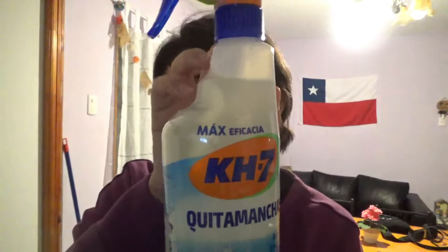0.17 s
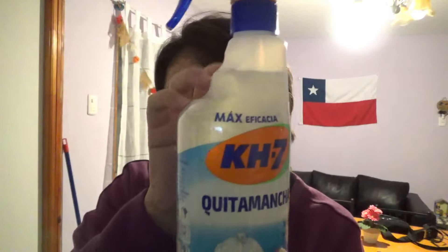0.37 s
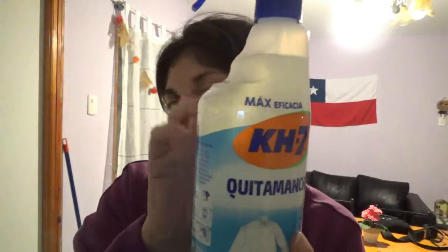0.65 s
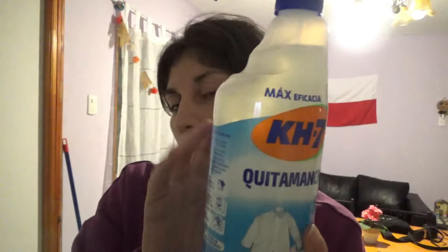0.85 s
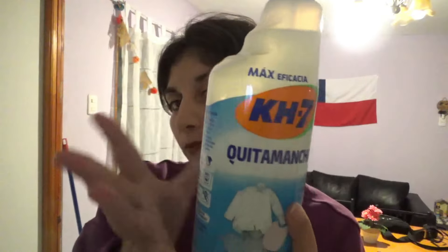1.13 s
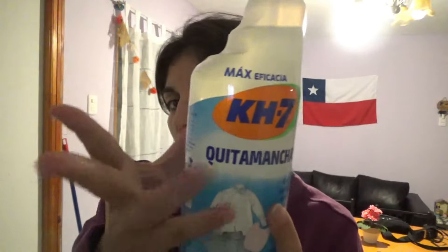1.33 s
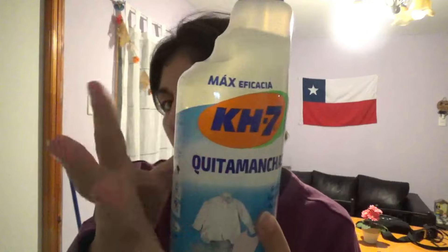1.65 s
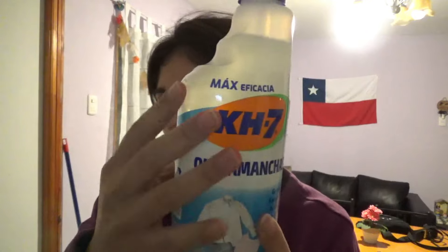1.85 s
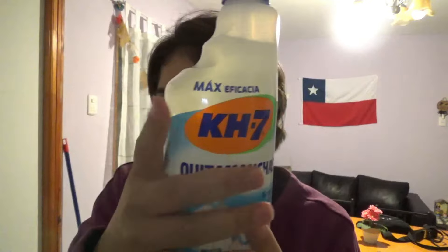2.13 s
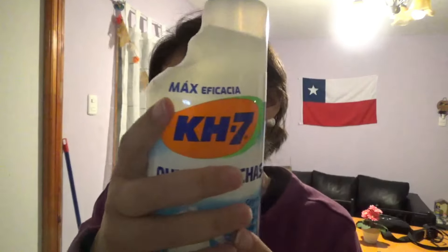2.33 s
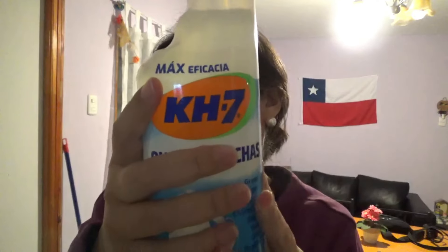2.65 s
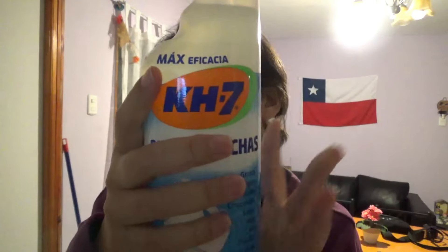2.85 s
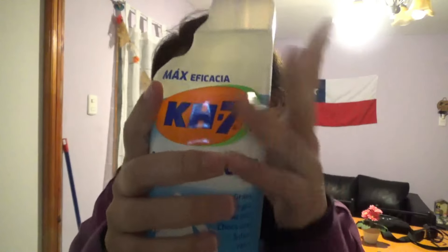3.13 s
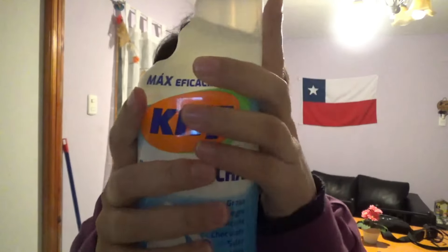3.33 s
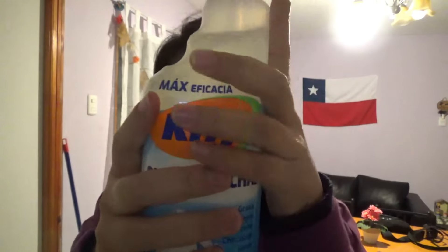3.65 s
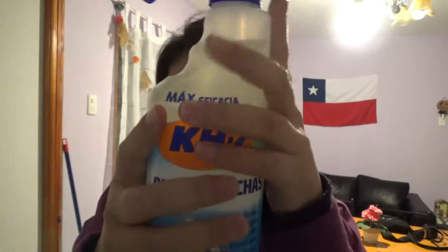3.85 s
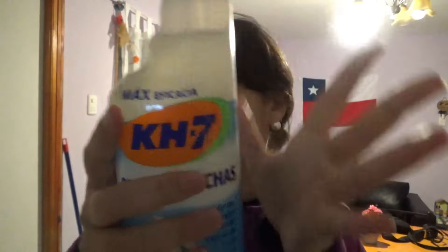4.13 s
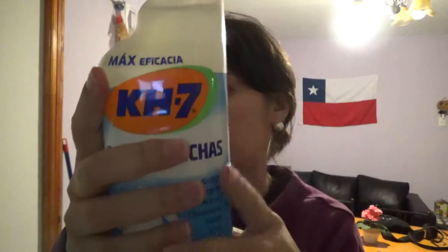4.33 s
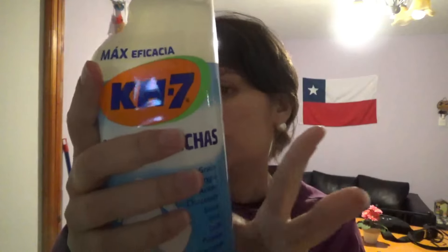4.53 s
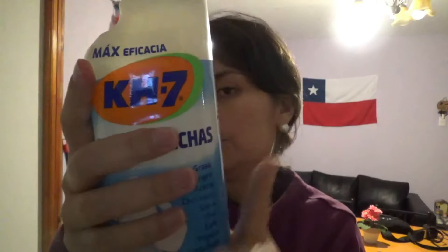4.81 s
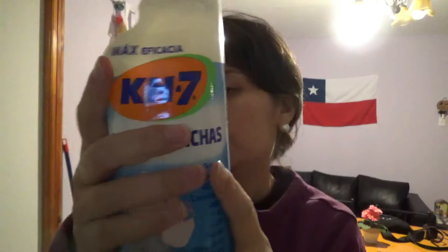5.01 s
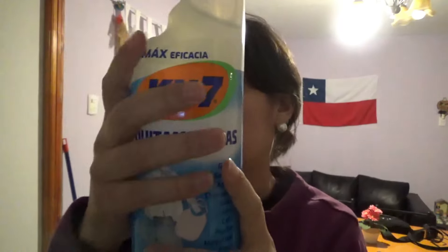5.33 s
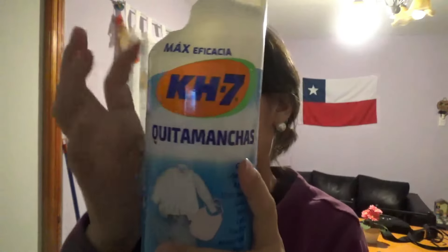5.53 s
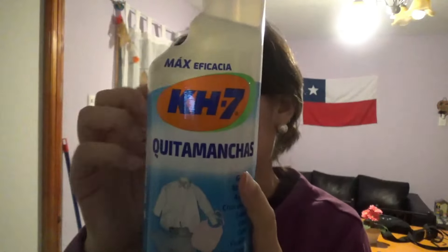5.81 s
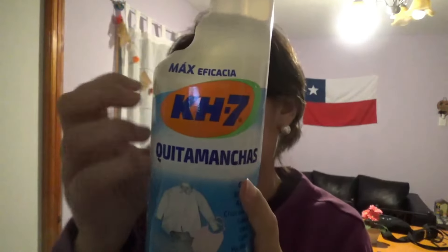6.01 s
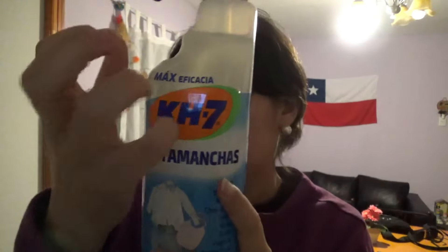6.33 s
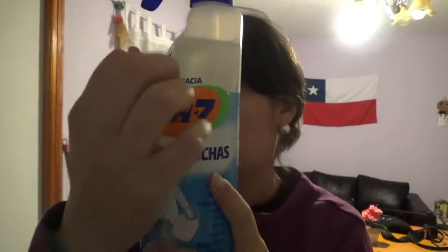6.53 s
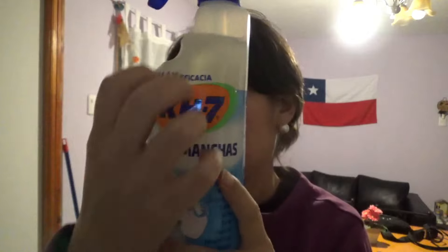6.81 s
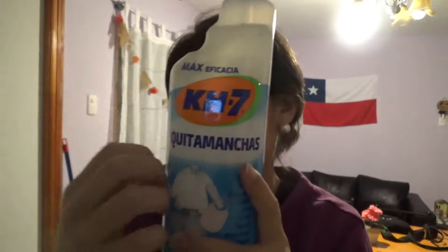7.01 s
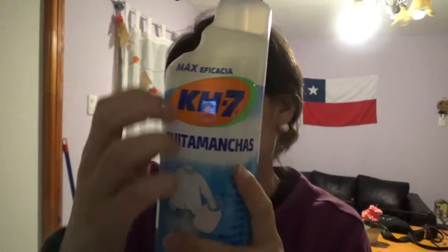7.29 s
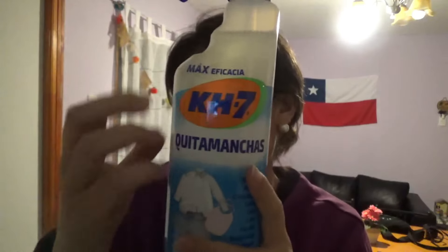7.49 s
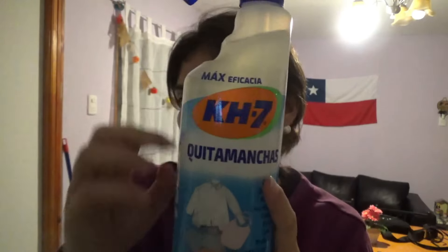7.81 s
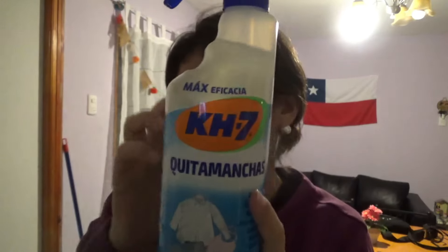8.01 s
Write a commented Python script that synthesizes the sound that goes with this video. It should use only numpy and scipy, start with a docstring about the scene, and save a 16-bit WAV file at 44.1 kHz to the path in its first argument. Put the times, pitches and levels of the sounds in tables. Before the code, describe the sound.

Very close, dry tapping on a filled plastic bottle: crisp nail clicks, often in tight pairs or triplets, each with a small dull body thump. Short airy scrapes trail between them. After a short early gap the taps keep coming unevenly, with strong knocks around the middle, then clusters and rougher rasping strokes toward the end. Small room reflections, slightly dull top end and quiet background rumble.

```python
"""Fingernails on a spray bottle

Fingernails tap, graze and scratch a plastic spray bottle, nearly full of liquid, in a living room.
Each touch sends a sharp burst into ringing tones: a bright nail tick and a clack of the thin wall.
Slow decaying swings add the soft thump of the filled body; a faint second click follows as the nail slips.
Sliding nails are noise: a hiss over the flat label, with more rasp on the narrow side.
Fading noise gives the room's short tail; shaped noise and faint wavering tones lie in the background."""
import sys
import numpy as np
from scipy import signal
from scipy.fft import rfft, irfft
from scipy.io import wavfile
from scipy.ndimage import uniform_filter1d, map_coordinates

SR = 44100
rng = np.random.default_rng(int(sys.argv[2]) if len(sys.argv) > 2 else 0)


def store_pcm(level_fs):
    """Save levels as 16-bit WAV."""
    pcm = np.round(np.clip(level_fs, -1, 1) * 32767).astype(np.int16)
    wavfile.write(sys.argv[1], SR, np.atleast_2d(pcm).T)


N = 359415

# fingers landing on the bottle, levels before the small trims in taps():
# start_s, tick_db (nail), clack_db (wall), thump_db (body)
TOUCHES = [(0.1497, -50, -50, -58.5), (0.1586, -42.5, -39, -62), (0.179, -27.5, -30.5, -67),
           (0.372, -34.5, -35.5, -54.5), (0.5164, -42, -49.5, -57.5), (0.5264, -46, -43, -52.5),
           (0.561, -48.5, -42, -55), (0.6966, -40.5, -42.5, -53.5), (0.7128, -48, -51, -78),
           (0.8494, -52, -62, -83), (0.9185, -51, -58, -86), (1.39, -30.5, -49.5, -56.5),
           (1.459, -38.5, -48, -50.5), (1.4984, -56.5, -53, -75), (1.7803, -20.5, -36, -50),
           (1.8112, -35.5, -45, -48.5), (2.0803, -39, -42, -99), (2.093, -45, -63, -72),
           (2.1567, -47, -73, -81), (2.1965, -33, -54, -68), (2.2034, -40.5, -37, -86),
           (2.2702, -41.5, -50, -58), (2.3903, -40.5, -68, -66), (2.412, -37.5, -41, -78),
           (2.5863, -32, -51.5, -56), (2.6261, -40, -44.5, -54.5), (2.824, -50, -61, -72),
           (2.879, -51.5, -69, -66), (3.1654, -47, -60.5, -63), (3.172, -49, -51, -73.5),
           (3.2176, -45.5, -57, -54), (3.427, -50.5, -62, -66), (3.5796, -22, -38, -48),
           (3.5945, -32, -44, -72), (3.6048, -39, -58, -75), (3.727, -48, -55, -67.5),
           (3.845, -39.5, -74, -83), (3.8667, -42.5, -41, -50), (3.9969, -49, -54, -63),
           (4.3109, -20, -31, -43), (4.3322, -42, -41, -62), (4.349, -41, -50, -69),
           (4.5904, -47.5, -62, -60), (4.6164, -18.5, -34.5, -39), (4.6394, -39, -51, -60),
           (4.6443, -39, -47, -59), (4.8465, -48, -55.5, -64), (4.9982, -46, -55.5, -66),
           (5.021, -41.5, -54, -77), (5.0432, -37.5, -47, -59), (5.2188, -51, -61, -69),
           (5.269, -36, -50, -68), (5.4015, -42, -59, -62.5), (5.711, -30, -45.5, -45),
           (5.7342, -31.5, -40.5, -49), (5.7696, -28, -40.5, -50.5), (5.838, -39.5, -45.5, -49),
           (5.963, -42, -54, -81), (5.982, -37, -47.5, -54.5), (6.0604, -33.5, -46.5, -55),
           (6.0986, -39.5, -57, -72), (6.2405, -38, -49, -56.5), (6.3774, -61, -55.5, -72),
           (6.4495, -52, -51.5, -69), (6.464, -43, -37.5, -46.5), (6.4948, -51, -72, -72),
           (6.523, -54.5, -48.5, -55), (6.6893, -34.5, -41, -61), (6.7182, -43.5, -45.5, -57),
           (6.7512, -38.5, -38.5, -53), (6.978, -34.5, -63, -73), (7.2356, -32.5, -45.5, -54.5),
           (7.2414, -35, -39.5, -53), (7.2457, -32.5, -46.5, -52), (7.251, -43, -47, -55),
           (7.327, -40, -62, -81), (7.401, -44.5, -68, -73), (7.568, -46.5, -51, -55.5),
           (7.5867, -41.5, -52, -55), (7.608, -38.5, -44.5, -53.5), (7.977, -39, -48, -48.5),
           (7.9849, -41, -44, -52)]

MIDDLING_DB = -37  # nail level of a middling touch
TICK_S, THUMP_S = 0.0035, 0.02  # stretches over which loudness is judged
APPROACH_S = 0.01  # time inside a click before the nail lands


def from_db(db):
    """Turn decibels into a gain."""
    return 10 ** (np.asarray(db) / 20)


def rms_one(x):
    """Scale to unit power."""
    return x / np.sqrt(np.mean(x ** 2) + 1e-20)


def loudest_one(x, span_s):
    """Scale so that the loudest stretch of this length has unit power."""
    power = uniform_filter1d(x ** 2, int(span_s * SR), mode="constant")
    return x / np.sqrt(power.max() + 1e-20)


def at_hz(points, hz, axis=1):
    """Read a column of a table between its points, with pitch on a log scale."""
    points = np.array(points)
    return np.interp(np.log(np.maximum(hz, 1)), np.log(points[:, 0]), points[:, axis])


def add(out, start_s, sound):
    """Mix a sound into a track."""
    i = max(round(start_s * SR), 0)
    out[i:i + len(sound)] += sound[:max(N - i, 0)]


def coloured(x, spectrum):
    """Give a steady noise its balance of bass and treble, at unit power."""
    gain = from_db(at_hz(spectrum, np.fft.rfftfreq(N, 1 / SR)))
    return rms_one(irfft(rfft(x) * gain, N))


def low_noise(size, rate_hz):
    """Random wandering no faster than about rate_hz, at unit power."""
    low_pass = signal.butter(2, rate_hz, fs=SR, output="sos")
    return rms_one(signal.sosfilt(low_pass, rng.standard_normal(size)))


def diffuse(size):
    """Stereo noise from all around: alike in the bass, mostly unrelated in the treble."""
    # how alike left and right are: pitch_hz, likeness (0-1)
    likeness = [(60, 0.98), (170, 0.98), (350, .55), (700, 0.12), (1500, 0.1), (5000, 0.27), (10000, 0.27)]
    alike = np.clip(at_hz(likeness, np.fft.rfftfreq(size, 1 / SR)), -1, 1)
    mid, side = rfft(rng.standard_normal((2, size)))
    return irfft(np.sqrt(1 + alike) * mid + np.sqrt(1 - alike) * side * [[1], [-1]], size)


def resonate(x, modes, tilt_db, detune, vary_db):
    """Ringing tones side by side, varying in pitch and strength by touch; tilt_db is dB an octave."""
    out = 0
    for k, (hz, width, db) in enumerate(modes):
        r = np.exp(-np.pi * width / SR)  # a wider resonance dies faster
        w = 2 * np.pi * hz * np.exp(detune * rng.normal()) / SR
        level_db = db + tilt_db * np.log2(hz / modes[0][0]) + vary_db * rng.normal()
        gain = (-1) ** k * from_db(level_db) * (1 - r * r) / 2
        out = out + gain * signal.lfilter([1, 0, -1], [1, -2 * r * np.cos(w), r * r], x)
    return out


def on_side(s):
    """How far the nails are on the narrow side at this moment, 0-1."""
    # where the nails work: time_s, place (0 = flat label, 1 = narrow side of the bottle)
    spot_path = [(0, 1), (.9, 1), (1.3, 0), (6.25, 0), (6.37, 1), (8.15, 1)]
    return np.interp(s, *np.transpose(spot_path))


def slides():
    """Scratches, and the drag to rest after each touch: fastest s, rise s, fall s, hiss dB, rasp dB."""
    # scratches: fastest_s (moment of top speed), length_s, hiss_db (nail), rasp_db (wall);
    # levels before the small trims in scratches()
    strokes = [(0.022, 0.21, -64.5, -57), (0.232, 0.6, -62.5, -74), (0.746, 0.058, -56, -55),
               (1.54, 0.028, -53, -79), (2.087, 0.035, -44, -81), (2.174, 0.11, -55, -85),
               (2.303, 0.19, -54.5, -68), (2.393, 0.051, -48, -72), (2.482, .1, -56.5, -66.5),
               (2.584, 0.038, -50, -72), (2.809, .065, -51, -79), (3.198, 0.081, -50.5, -69),
               (3.415, 0.074, -55, -64), (3.87, 0.11, -52, -64), (3.982, 0.093, -55, -65),
               (4.405, .06, -48.5, -80), (4.942, 0.16, -57.5, -73), (5.059, 0.077, -44, -67),
               (5.257, 0.083, -48, -66), (5.414, 0.1, -50, -72), (5.82, 0.29, -54.5, -58.5),
               (6.02, 0.23, -56.5, -75), (6.87, 0.17, -51, -61), (6.954, 0.21, -46, -49.5),
               (7.356, 0.21, -42.5, -50.5), (7.709, 0.18, -43.5, -50), (8.079, 0.17, -45, -51.5)]
    rise_share = 0.56  # part of a scratch spent speeding up
    drag_rise_s, drag_fall_s = 0.015, 0.17
    middling_drag_db, drag_follows = -67.5, 0.54  # hiss level; share of the touch's strength passed on
    drag_rasp_db, side_rasp_db = -9.5, 9  # rasp against hiss; extra on the narrow side
    rows = []
    for s, length, hiss_db, rasp_db in strokes:
        rows.append((s, rise_share * length, (1 - rise_share) * length, hiss_db, rasp_db))
    for s, nail_db, _, _ in TOUCHES:
        hiss_db = middling_drag_db + drag_follows * (nail_db - MIDDLING_DB)
        rasp_db = hiss_db + drag_rasp_db + side_rasp_db * on_side(s)
        rows.append((s + drag_rise_s, drag_rise_s, drag_fall_s, hiss_db, rasp_db))
    return rows


def friction(catches_per_s, size_db, smooth):
    """Tiny catches of uneven size on top of smooth rubbing."""
    sizes = from_db(size_db * np.minimum(rng.exponential(1, N), 5)) * rng.choice([-1, 1], N)
    catches = sizes * (rng.random(N) < catches_per_s / SR)
    return rms_one(catches) + smooth * rng.standard_normal(N)


def snags(snags_per_s=35, size_db=5.5, snag_s=0.0008):
    """Now and then a sliding nail snags and lets go with a small fading tick; unit power."""
    sizes = from_db(size_db * np.minimum(rng.exponential(1, N), 3))
    releases = sizes * (rng.random(N) < snags_per_s / SR)
    fading = signal.lfilter([1], [1, -np.exp(-1 / (snag_s * SR))], releases + 1e-18)
    return rms_one(fading * rng.standard_normal(N))


def travelling(x, depth=0.48, path_s=0.0005, spread=0.25, wander_hz=8):
    """A reflection from the edge of the panel colours the scrape; its delay wanders at random."""
    lag = SR * path_s * np.exp(spread * low_noise(N, wander_hz))
    reflection = map_coordinates(x, [np.arange(N) - lag], order=3)
    return rms_one(x + depth * reflection)


def scratches(hiss_db=-0.2, rasp_db=-0.9, swell=1.33, rasp_swell=0.99,
              judder_db=2.0, skip_db=-48, snag_db=-10):
    """Slides speed up and slow down; in the hiss, a light nail skips and a firm one rubs densely."""
    # friction of a sliding nail: pitch_hz, level_db (relative, per Hz)
    hiss_spectrum = [(1800, -29), (2900, -16), (4500, -11.5), (6300, -5), (7700, 3.5), (9000, 2),
                     (10300, -3.5), (12000, -12.5)]
    # the wall dragged by a sliding nail: pitch_hz, level_db (relative, per Hz)
    rasp_spectrum = [(150, -13.5), (215, -1.5), (380, -17.5), (550, -6), (900, -6.5), (1280, 2.5),
                     (1720, 2), (2500, -8), (3200, -3), (4600, -18), (8000, -9)]
    hiss_power, rasp_power = np.zeros(N), np.zeros(N)
    for fastest, rise, fall, nail_db, wall_db in slides():
        times = np.arange(-min(rise, fastest), fall, 1 / SR)
        phase = np.interp(times, [-rise, 0, fall], [0, 1, 0])
        speed = np.sin(phase * np.pi / 2) ** swell
        add(hiss_power, fastest - rise, (from_db(nail_db + hiss_db) * speed) ** 2)
        add(rasp_power, fastest - rise, (from_db(wall_db + rasp_db) * speed ** rasp_swell) ** 2)

    firm = hiss_power / (hiss_power + from_db(skip_db) ** 2)  # 0 = light, 1 = firm
    skipping = rms_one(friction(catches_per_s=830, size_db=3.0, smooth=0.91))
    rubbing = rms_one(friction(catches_per_s=3000, size_db=1.0, smooth=0.7))
    nail = np.sqrt(1 - firm) * skipping + np.sqrt(firm) * rubbing + from_db(snag_db) * snags()
    nail_judder = from_db(judder_db * low_noise(N, 70))
    hiss = travelling(coloured(nail * nail_judder, hiss_spectrum))
    wall = rubbing + from_db(snag_db) * snags()
    wall_judder = from_db(judder_db * low_noise(N, 45))
    rasp = travelling(coloured(wall * wall_judder, rasp_spectrum))
    return np.sqrt(hiss_power) * hiss + np.sqrt(rasp_power) * rasp


def contact(t, land_s, skid_s, shiver_db, shiver_t60, brush_db, brush_s):
    """The nail brushes the wall, lands at t = 0 and skids; bending waves then run round the shell."""
    before, after = np.maximum(-t, 0), np.maximum(t, 0)
    blow = np.exp(-np.minimum(before / land_s + after / skid_s, 20))
    brush = from_db(brush_db) * np.exp(-before / brush_s) * (t < 0)
    shiver = from_db(shiver_db - 60 * np.minimum(after / shiver_t60, 3)) * (t >= 0)
    return np.sqrt(blow ** 2 + brush ** 2 + shiver ** 2) * rng.choice([-1, 1], len(t))


def click(nail_db, wall_db, side, clack_over_thump_db):
    """Nail and wall ring together: a harder nail ticks brighter, and the narrow side clacks darker."""
    # nail on plastic: pitch_hz, width_hz, level_db (relative, before tilt)
    nail_modes = [(5930, 850, -13.5), (7450, 630, -3.5), (8850, 930, -1), (9930, 2550, -9)]
    # bottle wall: pitch_hz, width_hz, level_db (relative, before tilt)
    wall_modes = [(515, 150, -7), (810, 106, -11), (1160, 140, -6), (1540, 140, -1), (2300, 550, -5),
                  (2790, 310, -1), (3143, 390, -1), (4000, 294, 0.5), (5120, 810, -2)]
    t = np.arange(int(0.06 * SR)) / SR - APPROACH_S
    on_nail = contact(t, land_s=0.000099, skid_s=0.00057, shiver_db=-13.5, shiver_t60=0.028,
                      brush_db=-19.0, brush_s=0.0015)
    on_wall = contact(t, land_s=0.00018, skid_s=0.0003, shiver_db=-9.5, shiver_t60=0.026,
                      brush_db=-28.5, brush_s=0.0033)
    # tilts in dB an octave: more treble for a harder nail, or for a clack that outweighs its thump
    tick_tilt_db = -3.5 + 0.23 * (nail_db - MIDDLING_DB) + 0.5 * side
    clack_tilt_db = -0.13 + 0.15 * clack_over_thump_db - 3.5 * side
    tick = resonate(on_nail, nail_modes, tick_tilt_db, detune=0.043, vary_db=1.0)
    clack = resonate(on_wall, wall_modes, clack_tilt_db, detune=0.055, vary_db=1.0)
    return from_db(nail_db) * loudest_one(tick, TICK_S) + from_db(wall_db) * loudest_one(clack, TICK_S)


def thump(t, body_db, push_s=0.006, vary_db=2.0, sway_gain=0.044, firm_db=-50, shell_db=-9, pad_s=0.002):
    """The fingertip dents the wall, which swings against the liquid; the shell gives a hollow knock."""
    # wall flexing against the liquid: pitch_hz, t60_s (time to fade by 60 dB), level_db (relative)
    body_modes = [(72, .24, -14), (135, .09, -5), (172, .085, 0), (212, .085, 0)]
    # hollow ring of the whole shell: pitch_hz, width_hz, level_db (relative)
    shell_modes = [(502, 42, 2), (650, 56, -1.5), (850, 56, -1.5), (1080, 53, -6), (1250, 80, -4.5),
                   (1595, 59, 0.5)]
    detune, sag_per_db = 0.04, 0.012  # pitch varies with the spot and sinks with a deeper dent (shares)
    swing, firm = 0, max(body_db - firm_db, 0)
    pitch_factor = np.exp(detune * rng.normal() - sag_per_db * firm)
    for k, (hz, t60, db) in enumerate(body_modes):
        sway_db = sway_gain * firm * (k == 0)  # hard blows rock the whole bottle
        fade = from_db(db + sway_db + vary_db * rng.normal() - 60 * t / t60)
        swing = swing + fade * np.sin(2 * np.pi * hz * pitch_factor * t)
    body = loudest_one(swing * (1 - np.exp(-t / push_s)), THUMP_S)
    pad = rng.standard_normal(len(t)) * np.exp(-np.minimum(t / pad_s, 20))
    knock = loudest_one(resonate(pad, shell_modes, 0, detune=0.058, vary_db=3.0), THUMP_S)
    return from_db(body_db) * (body + from_db(shell_db) * knock)


def taps(tick_db=1.5, clack_db=0.0, thump_db=0.0, lead_s=0.0004, thump_lag_s=0.0012):
    """Every touch clicks, sets the body thumping, and clicks again faintly as the nail slips."""
    slip_within_s, mean_slip_db, slip_spread_db = 0.022, -18, 3.5  # latest slip; its level against the touch
    out, t = np.zeros(N), np.arange(int(0.2 * SR)) / SR
    for s, nail_db, wall_db, body_db in TOUCHES:
        start = s - lead_s - APPROACH_S
        side, clack_over_thump_db = on_side(s), wall_db - body_db
        add(out, start, click(nail_db + tick_db, wall_db + clack_db, side, clack_over_thump_db))
        add(out, s + thump_lag_s, thump(t, body_db + thump_db))
        slip_db = mean_slip_db + slip_spread_db * rng.normal()
        slip_start = start + slip_within_s * rng.uniform(0.11, 1)
        add(out, slip_start, click(nail_db + slip_db, wall_db + slip_db, side, clack_over_thump_db))
    return out


def room(x, build_s=0.00087, near_db=-20, near_t60=0.029, gap_s=0.0012, near_low_hz=700):
    """Quick scatter off hands and face, too small to throw back the bass; then a tail fading by band."""
    # room tail: pitch_hz, t60_s (time to fade by 60 dB), level_db (relative)
    room_tail = [(80, .45, -24), (198, 0.15, -10.5), (503, 0.72, -12), (1510, 0.12, -9.5),
                 (4000, 0.65, -17), (8500, 0.31, -23), (14000, 0.296, -26.5)]
    size = SR // 2
    t, hz = np.arange(size) / SR, np.fft.rfftfreq(size, 1 / SR)
    noise, response = rfft(diffuse(size)), 0
    edges = 40 * 2.0 ** np.arange(10)  # octave bands, Hz
    for low, high in zip(edges, edges[1:]):
        centre = np.sqrt(low * high)
        fade = from_db(-60 * t / at_hz(room_tail, centre)) * (1 - np.exp(-t / build_s))
        band = irfft(noise * ((hz >= low) & (hz < high)), size)
        level = from_db(at_hz(room_tail, centre, axis=2))
        response = response + level * band * fade / np.linalg.norm(fade)
    near_fade = from_db(-60 * t / near_t60) * (t > gap_s)
    no_bass = signal.butter(2, near_low_hz, "high", fs=SR, output="sos")
    scatter = signal.sosfilt(no_bass, diffuse(size))
    response = response + from_db(near_db) * scatter * near_fade / np.linalg.norm(near_fade)
    return signal.fftconvolve(x[None], response, axes=1)[:, :N]


def rumble(level_db=-62):
    """A steady low background: stereo noise, strongest in the bass."""
    # background: pitch_hz, level_db (relative, per Hz)
    rumble_spectrum = [(15, -36.5), (25, -19.5), (69, -1), (169, 0.5), (212, -4.5), (311, -9.5), (545, -10),
                       (954, -12), (1140, -12.5), (1550, -15), (2450, -17), (4070, -17.5), (6440, -21.5),
                       (9440, -20.5), (11000, -28), (14300, -63.5), (22000, -120)]
    return from_db(level_db) * coloured(diffuse(N), rumble_spectrum)


def hum(width_hz=7):
    """Faint tones of wavering phase swell and fade in the background."""
    # faint tones that come and go: middle_s, length_s, pitch_hz, level_db (before the swell)
    hum_tones = [(1.0, 0.73, 172, -67.5), (1.7, .6, 168, -62.5), (1.98, 0.23, 790, -73.5),
                 (5.6, 0.62, 131.6, -64.5), (7.08, .4, 151.2, -63), (7.95, 0.45, 140, -61.5)]
    out = np.zeros(N)
    for middle, length, hz, db in hum_tones:
        t = np.arange(int(length * SR)) / SR
        waver = low_noise(len(t), width_hz)
        tone = rms_one(np.sin(2 * np.pi * hz * t + waver))
        add(out, middle - length / 2, from_db(db) * tone * np.sin(np.pi * t / length))
    return out


def scene():
    """The bottle just in front of the microphone, with the room behind it."""
    # where the fingers are: time_s, left_minus_right_db
    place = [(0, -.8), (1, -.2), (3, -.4), (4.3, .5), (4.7, -.1), (5.6, .9), (8.1, .5)]
    bottle = taps() + scratches()
    pan_db = np.interp(np.arange(N) / SR, *np.transpose(place))
    background = rumble() + hum()
    return bottle * from_db(pan_db * [[0.5], [-0.5]]) + room(bottle) + background


def record(dry, leak_db=-26, treble_edge_hz=11020, cutoff_hz=15000):
    """The sound is dull above a sharp treble edge; only a faint part remains above it, up to the cutoff."""
    edge = signal.ellip(8, 0.3, 60, treble_edge_hz, fs=SR, output="sos")
    cutoff = signal.cheby1(10, 0.3, cutoff_hz, fs=SR, output="sos")
    kept = signal.sosfilt(edge, dry)
    return signal.sosfilt(cutoff, kept + from_db(leak_db) * dry)


dry = scene()
out = record(dry)
store_pcm(out)
```